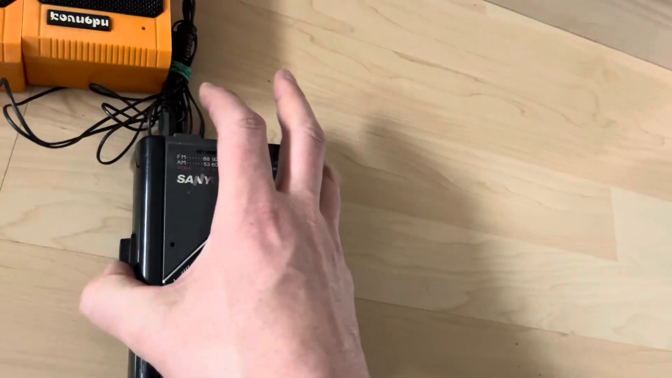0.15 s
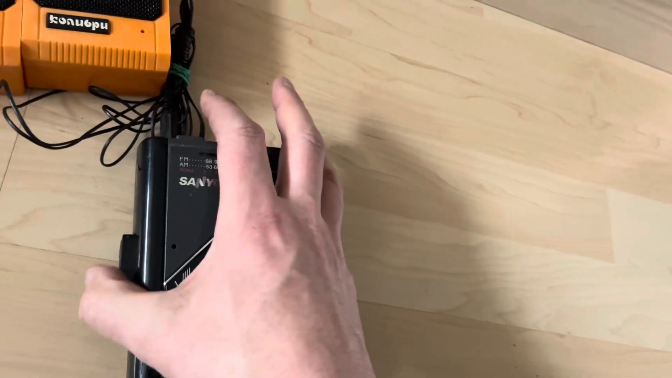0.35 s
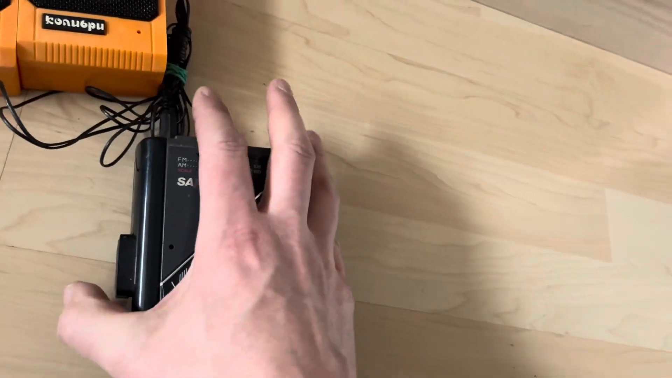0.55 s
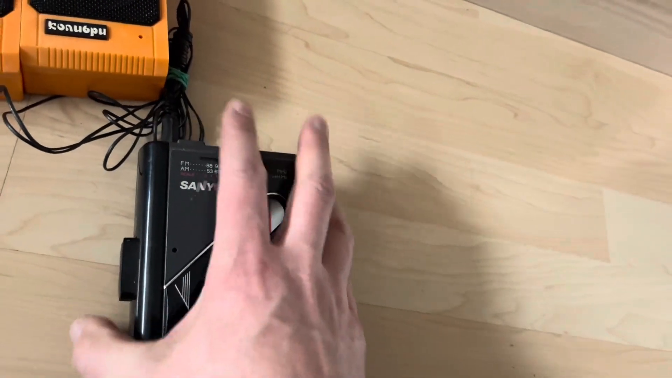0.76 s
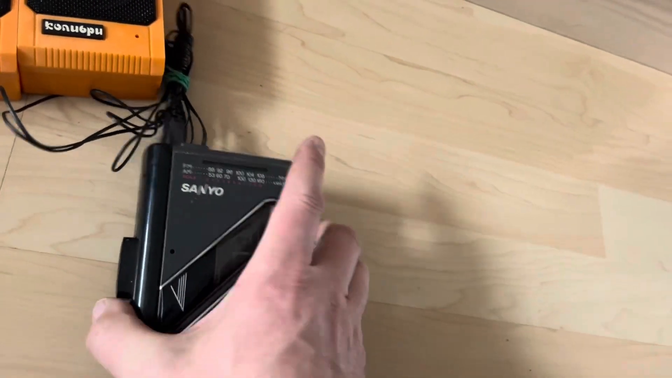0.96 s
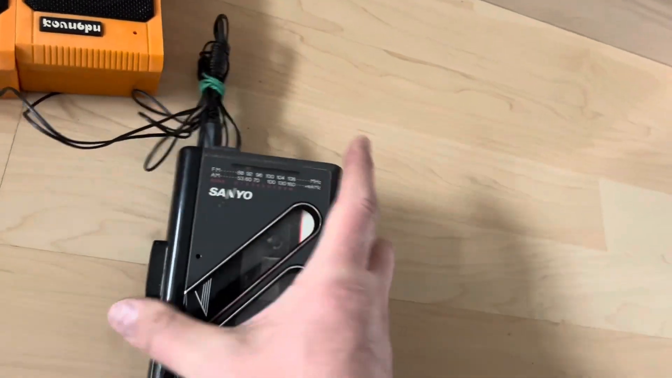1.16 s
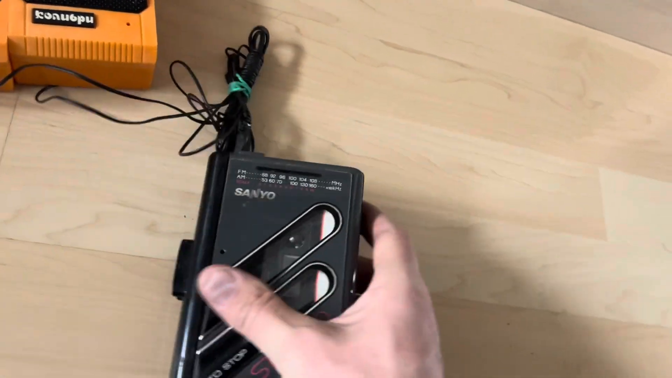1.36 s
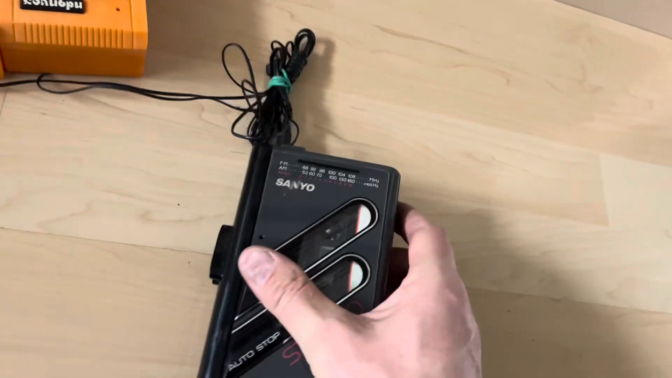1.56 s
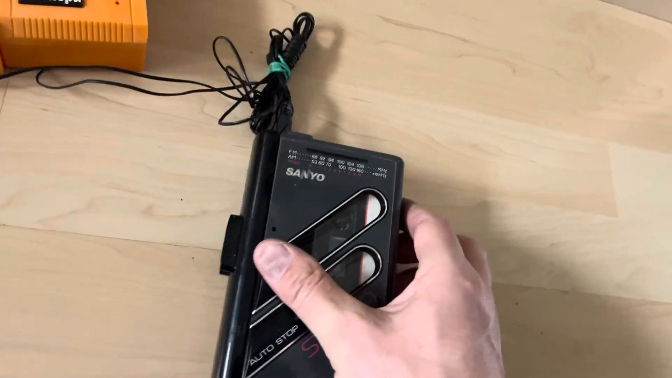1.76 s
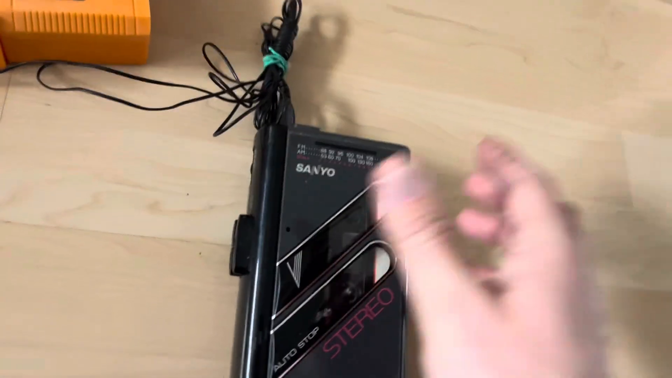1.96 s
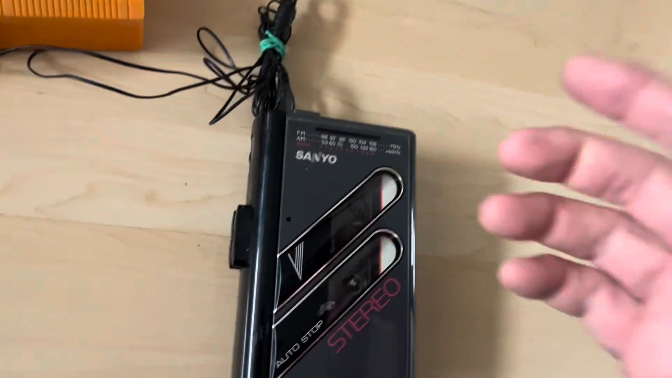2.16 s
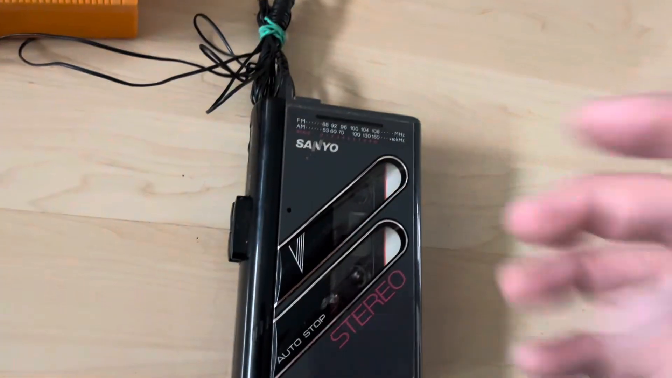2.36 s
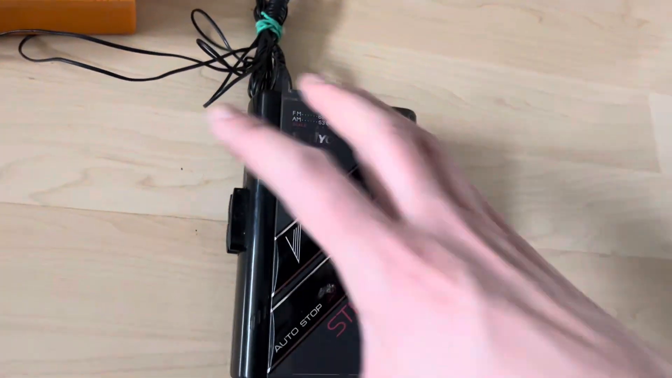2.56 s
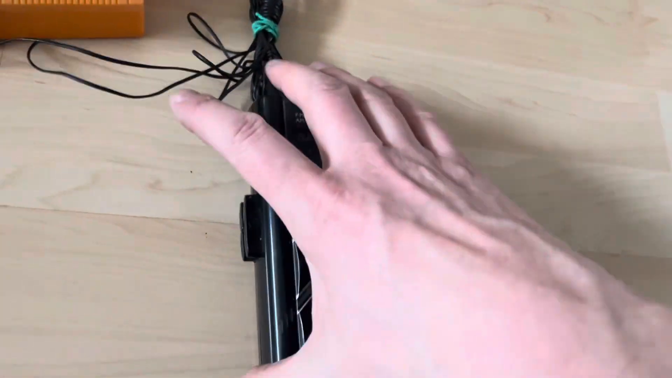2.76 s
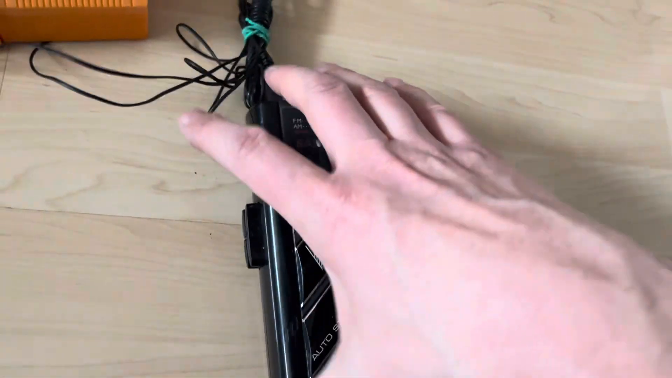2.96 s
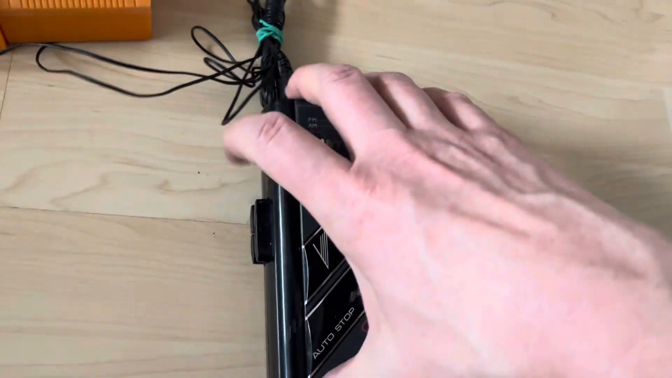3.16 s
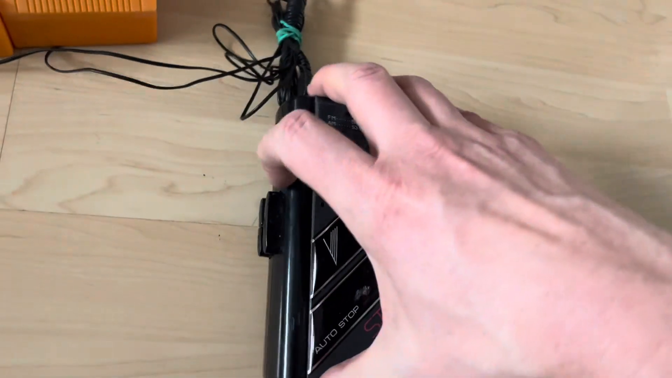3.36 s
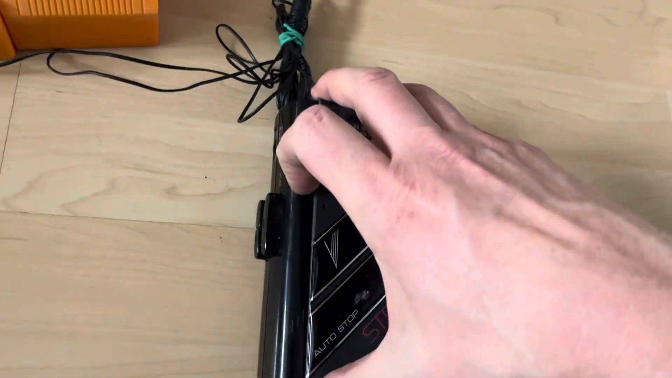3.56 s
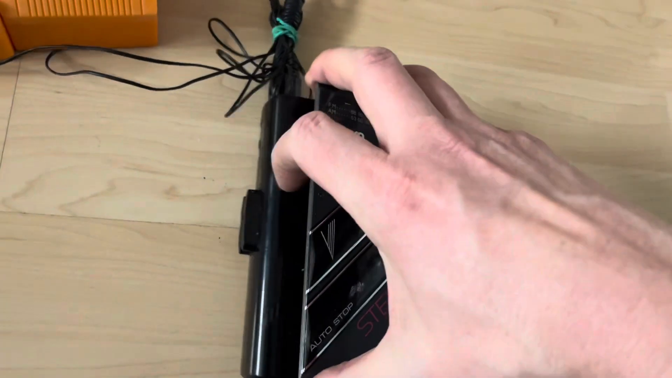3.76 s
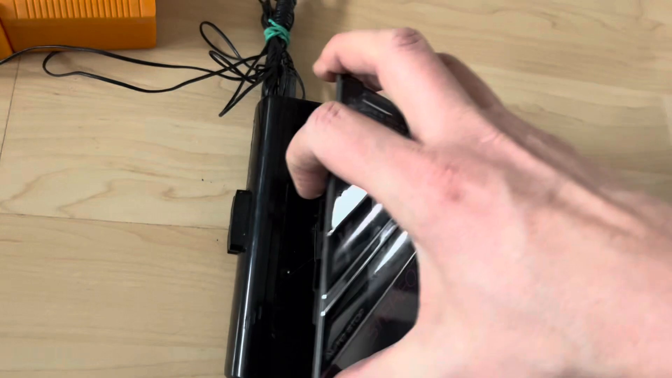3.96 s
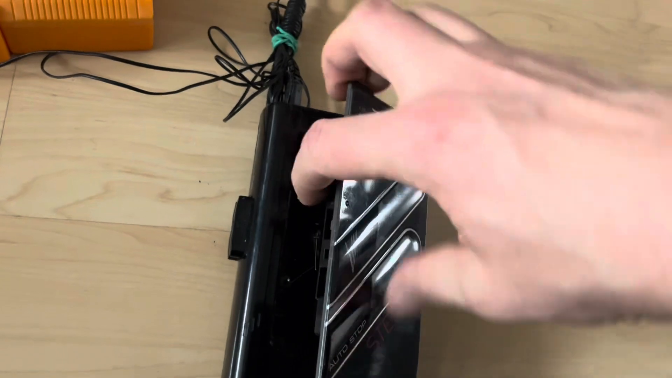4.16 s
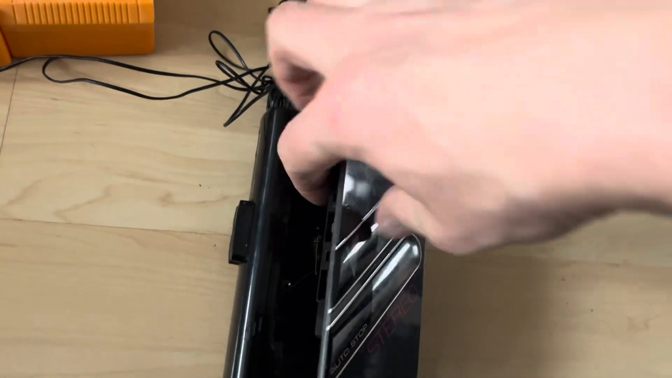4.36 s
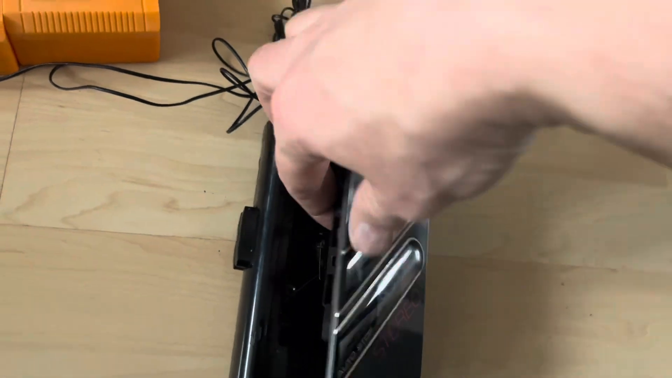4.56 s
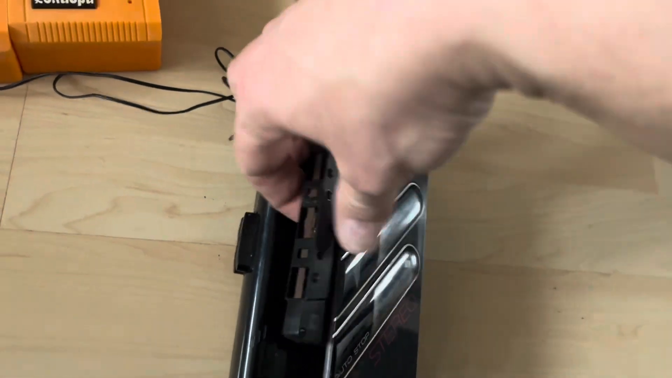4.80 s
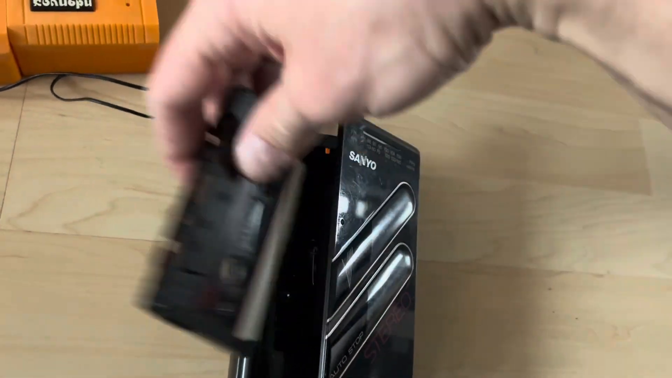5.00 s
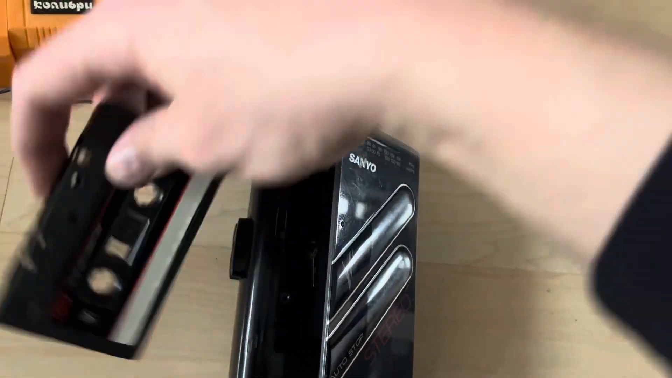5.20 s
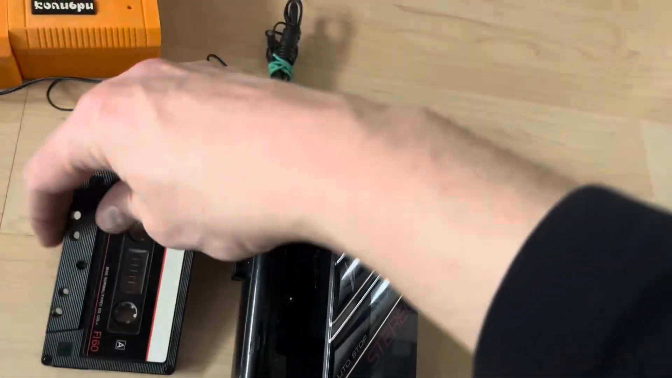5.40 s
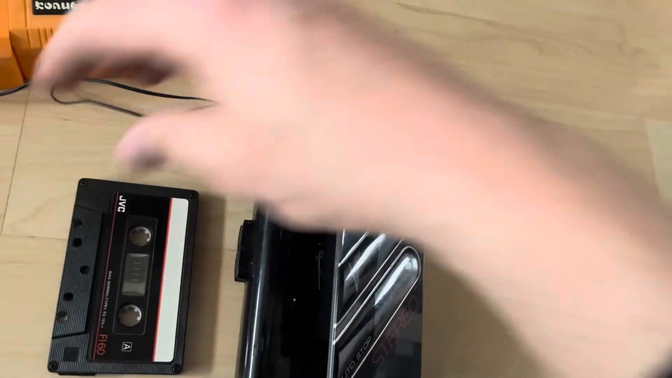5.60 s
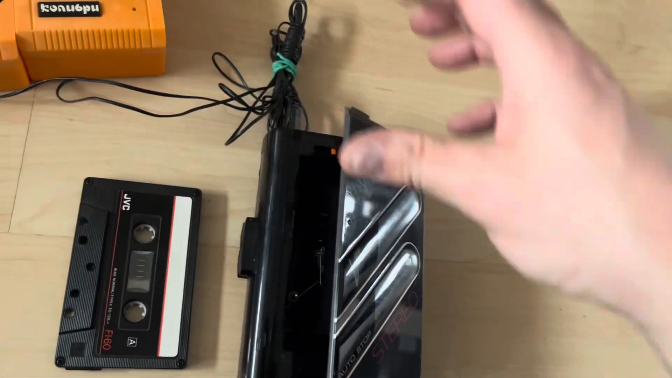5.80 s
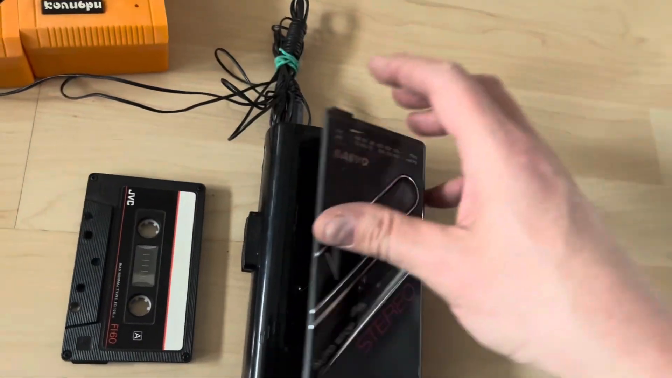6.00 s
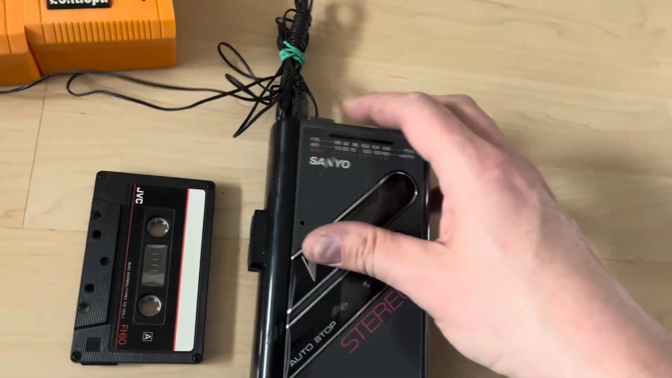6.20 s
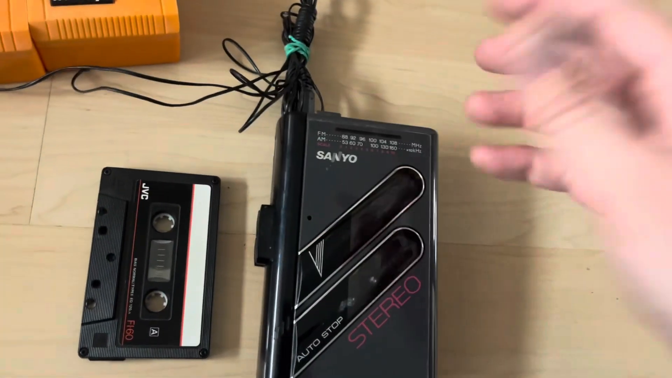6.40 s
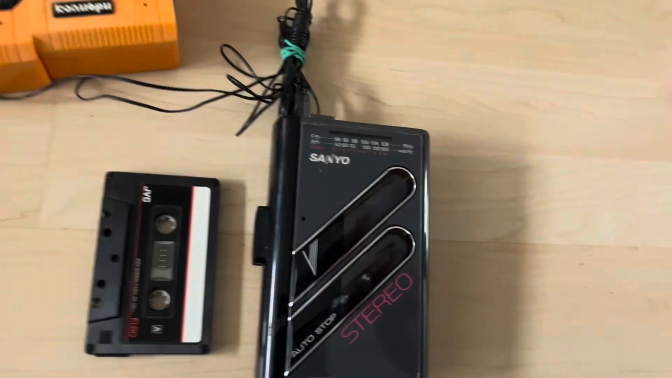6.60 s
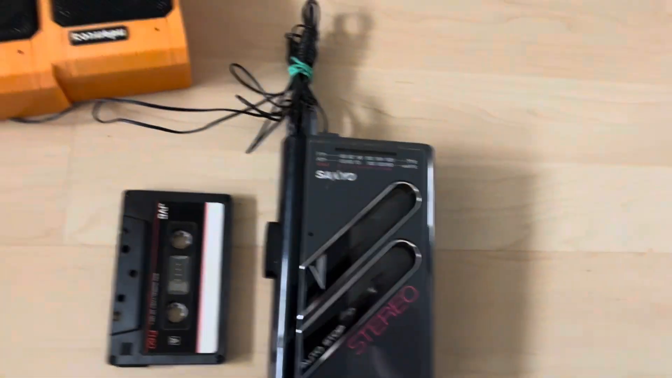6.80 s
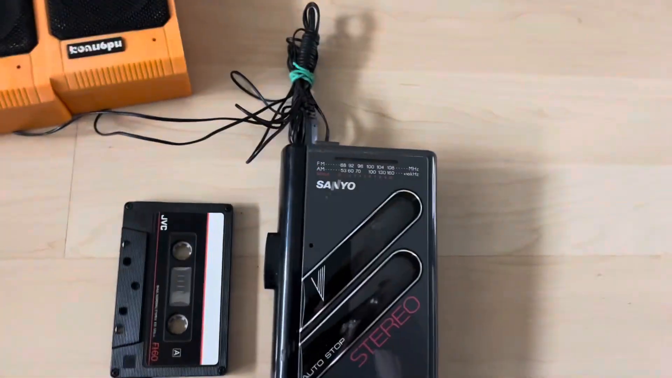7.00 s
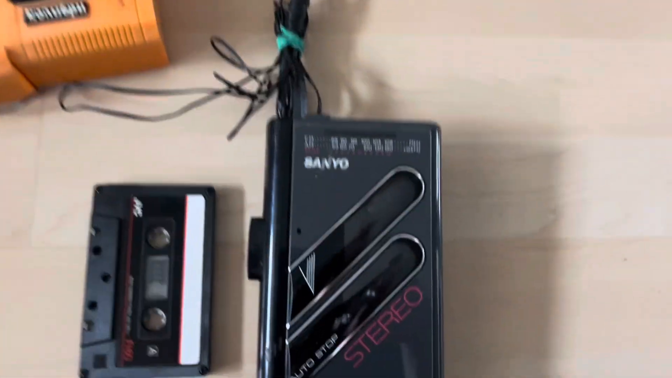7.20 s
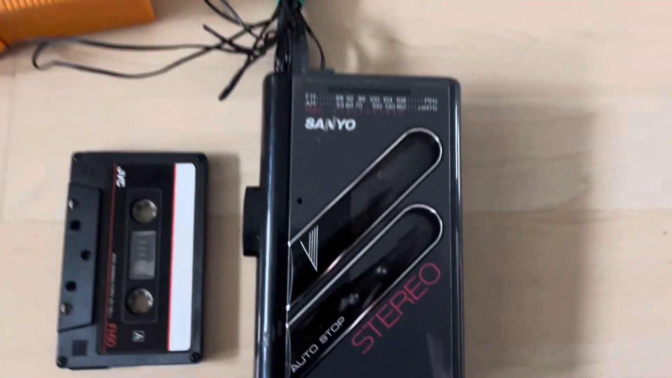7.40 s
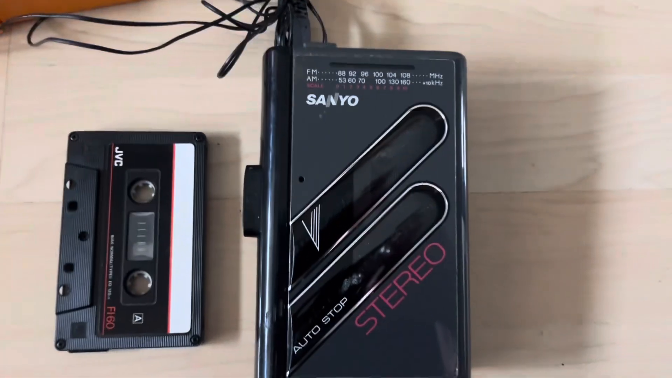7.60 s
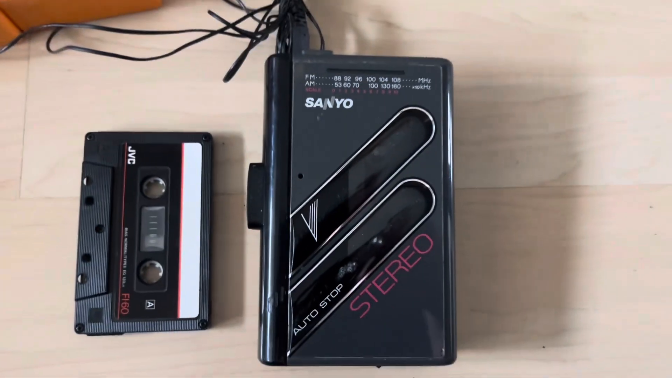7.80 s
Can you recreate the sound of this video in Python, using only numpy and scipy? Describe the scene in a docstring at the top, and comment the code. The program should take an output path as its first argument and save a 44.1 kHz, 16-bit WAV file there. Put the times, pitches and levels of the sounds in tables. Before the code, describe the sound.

Hands handle a plastic cassette player on a floor with clicks and dull knocks, set the cassette down and snap the door shut.

```python
"""Hands turn a portable cassette player on a laminate floor, fingers rubbing the case, a sleeve rustling; let
go, it rocks to rest. They prise its door open, slide the cassette out and set it down, and at six seconds the
door snaps shut. Contacts crack in the plastic shell and thump the floor panel. At the end come faint creaks of
fingers on the glass of a phone and soft scuffs of the grip on it, whose two ports listen close by in a small
room."""
import sys
import numpy as np
from scipy import signal
from scipy.fft import rfft, irfft, next_fast_len
from scipy.io import wavfile

SR = 44100
rng = np.random.default_rng(int(sys.argv[2]) if len(sys.argv) > 2 else 0)


def put_to_file(sound):
    """Save the sound as 16-bit audio at rate SR, in the file named by the first command-line argument."""
    columns = np.atleast_2d(sound).T  # one column per channel
    safe = np.clip(columns, -1, 1)
    whole_steps = np.round(safe * 32767)
    wavfile.write(sys.argv[1], SR, whole_steps.astype(np.int16))


N = 346075
TIME = np.arange(N) / SR
PADDED = next_fast_len(N, True)
BIN_HZ = np.fft.rfftfreq(PADDED, 1 / SR)
SIDES = np.array([[1], [-1]])  # left, right


def undb(db):
    """Decibels to gain."""
    return 10 ** (np.asarray(db) / 20)


def unit(x):
    """Scale to rms 1."""
    return x / np.sqrt(np.mean(x ** 2, axis=-1, keepdims=True) + 1e-20)


def fade(t, t60):
    """Exponential decay, 60 dB down at t60."""
    return np.exp(-np.log(1000) * t / np.maximum(t60, 1e-3))


def at_hz(hz, points, values):
    """Straight lines on a log-frequency axis."""
    return np.interp(np.log(np.maximum(hz, 1)), np.log(points), values)


def colour(x, spectrum, tilt_db=0):
    """Shape a signal with an EQ curve, tilted per octave; rms 1."""
    size = next_fast_len(x.shape[-1], True)
    hz = np.fft.rfftfreq(size, 1 / SR)
    db = at_hz(hz, *np.transpose(spectrum)) + tilt_db * np.log2(hz + 1)
    return unit(irfft(rfft(x, size) * undb(db), size)[..., :x.shape[-1]])


def band(x, hz, octaves):
    """Causal band-pass around hz."""
    edges = [hz / 2 ** (octaves / 2), min(hz * 2 ** (octaves / 2), SR / 2 - 1)]
    return signal.sosfilt(signal.butter(2, edges, "band", fs=SR, output="sos"), x)


def add(track, start, sound):
    """Mix a sound in at its time."""
    i = min(max(int(start * SR), 0), N)
    track[i:i + len(sound)] += sound[:N - i]


def wander(points):
    """A random line through points spread evenly over the scene."""
    return np.interp(TIME, np.linspace(0, TIME[-1], points), rng.standard_normal(points))


def grains(count, per_s, spread_db):
    """Tiny slips of uneven size at random moments."""
    slips = (rng.random(count) < per_s / SR) * rng.standard_normal(count)
    return slips * undb(spread_db * rng.standard_normal(count))


def ring(modes, t, gains=1):
    """Sum of decaying sines."""
    hz, db, t60 = np.transpose(modes)
    return (gains * undb(db)) @ (np.sin(2 * np.pi * hz[:, None] * t) * fade(t, t60[:, None]))


def blows(events, modes):
    """Each blow sets the same object ringing; neighbouring modes swing in opposite directions."""
    out, signs = np.zeros(N), (-1) ** np.arange(len(modes))
    for start, db in events:
        add(out, start, undb(db) * ring(modes, TIME[:SR // 4], signs))
    return out


# The low bed of the room. Each row: frequency in Hz, relative level in dB.
ROOM_TONE_EQ = [(20, -17), (40, -7.5), (58, 6), (100, 2), (200, -5.5), (380, -18), (540, -14.5), (900, -29),
                (1500, -18.5), (2300, -27.5), (4000, -40.5), (8000, -48), (16000, -51.5)]

def room_tone(level_db=-59.5, side_db=-8, drift_db=0.8):
    """A quiet indoor rumble that wanders slowly; left and right share its bass."""
    mid, side = colour(rng.standard_normal((2, N)), ROOM_TONE_EQ)
    side = irfft(rfft(side, PADDED) * np.minimum(BIN_HZ / 300, 1), PADDED)[:N]
    return (mid + undb(side_db) * side * SIDES) * undb(level_db + drift_db * wander(30))


# Small-room reverb. Each row: frequency in Hz, energy against the direct sound in dB, t60 in seconds.
REVERB = [(150, -12.5, 0.4), (393, -11, 0.3), (1000, -13, 0.18), (3060, -10.5, 0.18), (8600, -14.5, .21),
          (15000, -24, .18)]

def room_echo(x, gap_s=0.01, build_s=0.0017):
    """Walls and furniture return a short diffuse tail, narrow in the bass and wide on top."""
    t = TIME[:SR // 2]
    points, level_db, t60 = np.transpose(REVERB)
    onset = 1 - np.exp(-np.maximum(t - gap_s, 0) / build_s)
    response = 0
    for hz in np.geomspace(125, 16000, 8):
        noise = band(rng.standard_normal((2, len(t))), hz, octaves=1)
        mid, side = unit(noise * onset * fade(t, at_hz(hz, points, t60)))
        width = min(hz / 1400, .8)
        energy = np.sqrt(2) * hz / SR / len(t) / (1 + width ** 2)
        response += (mid + width * side * SIDES) * np.sqrt(energy) * undb(at_hz(hz, points, level_db))
    return signal.fftconvolve(x[None], response, axes=1)[:, :N]


# Spells in which fingers creak on the phone's glass. Each row: start in seconds, length in seconds, tick level
# in dB.
CREAK_SPELLS = [(6.416, 0.32, -54), (6.735, 0.15, -58), (7.72, 0.14, -48.5)]

def creak_ticks(count=16, gap_s=0.022, spread_db=2.5):
    """Within a spell the fingers tick at uneven gaps and strengths; gives times and levels."""
    ticks = []
    for start, length, db in CREAK_SPELLS:
        delays = gap_s * (np.arange(count) + rng.random(count))
        levels = db + spread_db * rng.standard_normal(count)
        ticks += [(start + delay, level) for delay, level in zip(delays, levels) if delay < length]
    return ticks


def glass_creaks(high_hz=1100, low_hz=280, sweep_s=0.003, peak_s=0.002594, grit_db=-2):
    """Fingers creak on the phone's glass; each tick arrives as a short, gritty falling chirp."""
    t, out = TIME[:SR // 25], np.zeros(N)
    grit_eq = [(60, -5.5), (300, 18), (800, -7.5), (1500, -17), (4000, -45.5)]
    sweep = low_hz + (high_hz - low_hz) * np.exp(-t / sweep_s)
    envelope = (t / peak_s * np.exp(1 - t / peak_s)) ** 2
    for start, db in creak_ticks():
        hz = sweep * np.exp(0.11 * rng.standard_normal())
        chirp = np.sin(2 * np.pi * np.cumsum(hz) / SR)
        grit = undb(grit_db) * colour(rng.standard_normal(len(t)), grit_eq)
        add(out, start - peak_s, undb(db) * envelope * (chirp + grit))
    return out


# The hollow voice of the plastic case. Each row: mode frequency in Hz, level in dB, t60 in seconds.
CASE_MODES = [(671, -4, 0.19), (707, -5, 0.33), (941, -3.5, 0.011), (1250, -2, .06), (1491, 4, .07),
              (2055, -8, 0.035), (2500, -3, 0.055), (2646, -1.5, 0.081), (3200, -3.5, .06),
              (3600, -4, 0.11), (4640, -3, 0.022), (5300, -8.5, 0.18), (7130, -6, 0.06)]

def hollow(x, ring_db=-5):
    """Friction also feeds the modes of the plastic shell; rms 1."""
    ringing = signal.oaconvolve(x, ring(CASE_MODES, TIME[:SR // 8]))[:len(x)]
    return unit(x + undb(ring_db) * unit(ringing))


def judder(strokes, spectrum, first_pressure=0.13):
    """Surfaces judder along each other, pressing harder until they come free."""
    out = np.zeros(N)
    for start, length, db, tilt_db in strokes:
        count = int(length * SR)
        pressure = np.linspace(first_pressure, 1, count) * signal.windows.tukey(count, .3)
        slips = colour(grains(count, per_s=9500, spread_db=2.0), spectrum, tilt_db)
        add(out, start, undb(db) * pressure * hollow(slips))
    return out


# Soft scuffs. Each row: start and length in seconds, full-pressure level in dB, tilt in dB per octave.
GRIP_SCUFFS = [(7.025, 0.055, -45, -1.5), (7.10, 0.044, -55, -2), (7.17, 0.129, -64, -1),
               (7.41, 0.094, -57.5, -2)]
# Their muffled tone. Each row: frequency in Hz, relative level in dB.
SCUFF_EQ = [(100, -16.5), (400, -13), (680, 6), (1050, -11.5), (1300, -5.5), (2000, -4.5), (2900, -29),
            (6000, -25), (12000, -30)]

def grip_scuffs():
    """The hand slips a little as its grip on the phone shifts."""
    return judder(GRIP_SCUFFS, SCUFF_EQ)


def stroke_envelope(start, length, attack_s=0.15, t60=0.54):
    """The hand speeds up, slides evenly, then comes to rest."""
    attack = np.clip((TIME - start) / attack_s + .5, 0, 1)
    return attack * fade(np.maximum(TIME - start - length, 0), t60)


# Strokes of the hand. Each row: start in seconds, length in seconds, rub level in dB, sleeve level in dB.
HAND_STROKES = [(0.0, 0.03, -45.5, -65), (0.115, 0.27, -64, -84), (0.68, 0.13, -77, -64.5),
                (0.816, 0.15, -58, -64), (1.06, 0.2, -55.5, -60), (1.4, 0.11, -56.5, -62.5),
                (1.825, 0.049, -56.5, -63.5), (1.98, 0.48, -90, -70.5), (2.66, 0.071, -57, -69.5),
                (2.882, 0.23, -56.5, -73), (3.247, 0.18, -58, -72.5), (3.592, 0.047, -48, -55),
                (3.71, 0.17, -59, -66.5), (3.95, 0.23, -64, -67.5), (4.34, 0.2, -66, -67.5),
                (4.596, 0.18, -48.5, -58.5), (4.912, 0.2, -60.5, -58.5), (5.3, 0.33, -64, -63),
                (6.301, 0.36, -70, -68.5)]
# The dull rub of the shell. Each row: frequency in Hz, relative level in dB.
RUB_EQ = [(150, -1.5), (420, -16.5), (680, 1.5), (900, -2.5), (1300, -3), (1700, -9), (2200, -11.5),
          (3400, -19), (5500, -18), (12000, -35.5)]
# The airy rustle of a sleeve as the arm moves. Each row: frequency in Hz, relative level in dB.
SLEEVE_EQ = [(800, -20), (2000, 1), (3800, 3.5), (5200, 4.5), (6200, 6.5), (7200, -2), (10500, -2),
             (13000, -6), (16000, -7.5)]

def fingers_and_sleeve(grip_db=2.0, catches_per_s=20, catch_db=-9, catch_t60=0.0067):
    """Fingers drag over the case with a grainy rub and small catches; a sleeve rustles as the arm moves."""
    rub_level, sleeve_level = 0, 0
    for start, length, rub_db, sleeve_db in HAND_STROKES:
        envelope = stroke_envelope(start, length)
        rub_level = np.maximum(rub_level, undb(rub_db) * envelope)
        sleeve_level = np.maximum(sleeve_level, undb(sleeve_db) * envelope)
    grip = undb(grip_db * wander(240))  # the fingers' hold changes some thirty times a second
    drag = hollow(colour(grains(N, per_s=2500, spread_db=3.0), RUB_EQ), ring_db=-6.5) * grip
    # now and then a nail or a loose part catches with a tiny tick
    snags = np.abs(grains(N, per_s=catches_per_s, spread_db=3.0))
    ticks = signal.oaconvolve(snags, fade(TIME[:SR // 20], catch_t60))[:N] * rng.standard_normal(N)
    catches = hollow(colour(ticks, RUB_EQ, tilt_db=1.0), ring_db=-11.5)
    sleeve = colour(rng.standard_normal(N), SLEEVE_EQ)
    return (drag + undb(catch_db) * catches) * rub_level + sleeve * sleeve_level


# Short scrapes. Each row: start and length in seconds, full-pressure level in dB, tilt in dB per octave.
PLASTIC_SCRAPES = [(0.282, 0.037, -37, -1), (0.899, 0.055, -53.5, -1.5), (1.851, 0.016, -33, -1),
                   (4.631, 0.014, -22, -1.5), (4.642, 0.035, -37, 6), (4.711, 0.12, -34.5, 0),
                   (4.788, 0.015, -20, 0), (4.861, 0.036, -44, 4.5), (5.482, 0.033, -25.5, 4),
                   (5.552, 0.048, -38.5, -1.5)]
# Their mid-heavy rasp. Each row: frequency in Hz, relative level in dB.
SCRAPE_EQ = [(200, -31), (450, -13), (700, 3), (880, -3), (1030, 7), (1250, -3), (2100, -8), (2350, -8),
             (2580, 0.5), (3400, -8.5), (5500, -11.5), (10000, -18), (13000, -27), (16000, -29.5)]

def plastic_scrapes():
    """Plastic sticks and slips as it slides on plastic."""
    return judder(PLASTIC_SCRAPES, SCRAPE_EQ)


def rocking(start_s=2.007, period_s=0.09, first_db=-42, loss_db=2.5, count=4):
    """Let go, the player rocks to rest in even, weakening bumps; gives times and levels."""
    return [(start_s + k * period_s, first_db - k * loss_db) for k in range(count)]


# Bumps on the floor, the weight under the clicks. Each row: start in seconds, level in dB.
FLOOR_BUMPS = [(0.0, -27), (0.047, -31), (0.075, -44), (0.324, -34.5), (0.36, -32), (0.412, -33.5),
               (0.832, -34.5), (0.879, -39), (0.964, -33), (1.117, -37), (1.448, -23), (1.599, -29.5),
               (1.863, -13), (1.908, -20.5), (2.689, -31.5), (2.907, -15), (2.959, -27), (3.11, -30.5),
               (3.645, -33), (3.807, -21.5), (3.842, -29), (3.993, -40), (4.38, -25.5), (4.43, -34.5),
               (4.457, -28.5), (4.585, -30), (4.641, -18), (4.814, -22.5), (4.858, -33), (4.974, -41.5),
               (5.288, -22), (5.4, -33.5), (5.506, -9.5), (5.548, -19.5), (6.056, -21.5), (6.087, -25.5),
               (6.22, -27), (6.257, -22.5), (6.345, -35)]

def floor_thuds(panel_hz=152, scatter=0.053, rise_s=0.012, swell=2.2, glide=0.96, glide_s=0.0025,
                boom_db=-20, boom_t60=0.29, sway_hz=82, sway_db=-25, sway_t60=0.38):
    """The floor panel swings up over a few cycles and dies away; the floor beneath sways slowly on."""
    t, out = TIME[:SR // 4], np.zeros(N)
    boom_eq = [(25, -19.5), (60, -5.5), (130, 0.5), (200, 4), (300, -9.5), (600, -45.5), (2000, -71.0)]
    envelope = (t / rise_s * np.exp(1 - t / rise_s)) ** swell
    onset = 1 - np.exp(-t / 0.00035)
    sway = ring([(sway_hz, sway_db, sway_t60)], t)
    pitch_drop = 1 + glide * np.exp(-t / glide_s)  # the faster, higher bending waves arrive first
    for start, db in FLOOR_BUMPS + rocking():
        # the pitch varies a little with the place of the bump
        hz = panel_hz * np.exp(scatter * rng.standard_normal()) * pitch_drop
        panel = envelope * np.sin(2 * np.pi * np.cumsum(hz) / SR)
        boom = undb(boom_db) * colour(rng.standard_normal(len(t)), boom_eq) * fade(t, boom_t60)
        add(out, start, undb(db) * (panel + (boom + sway) * onset))
    return out


# The cassette touches down. Each row: start in seconds, level in dB.
CASSETTE_HITS = [(5.294, -25.5), (5.505, -17), (5.550, -30)]
# The knock of the floor panel. Each row: mode frequency in Hz, level in dB, t60 in seconds.
PANEL_MODES = [(115, -7, 0.13), (215, 0, .06), (255, -1, .055), (295, 0, 0.055), (335, -4, 0.045),
               (420, -5, 0.033)]

def cassette_landing():
    """The hard edge of the cassette lands on the floor and rings the panel."""
    return blows(CASSETTE_HITS, PANEL_MODES)


SHELL_LOW_HZ, SHELL_HIGH_HZ = 734, 9600  # the shell radiates well between these edges

def click_db(hz, db, tilt_db, narrow_db, centre_hz=2530):
    """A hard contact is brighter than a soft one; a small part rings in a narrower range than the shell."""
    octaves = np.log2(np.clip(hz, SHELL_LOW_HZ, SHELL_HIGH_HZ) / centre_hz)
    return db + tilt_db * octaves - narrow_db * octaves ** 2


# Plastic contacts. Each row: start in seconds, level at the centre frequency in dB,
# tilt in dB per octave, narrowness in dB per octave squared.
CONTACTS = [(0.043, -49, -5, -0.5), (0.078, -47.5, -3.4, -0.5), (0.304, -52, 10.5, 6.5),
            (0.322, -34, -3, 0.46), (0.412, -57.5, -16, 7.5), (0.831, -65.5, -10.5, 0.5),
            (0.867, -59, -5.5, 0), (0.912, -60.5, -7, -1.5), (0.963, -50.5, -8, -0.25),
            (1.107, -62, -13.5, 4.5), (1.186, -57, -4, -.7), (1.223, -52, -5.5, 0), (1.448, -53, -6, -2.2),
            (1.589, -38.5, -4.5, 0), (1.8625, -43, -10, 2), (1.9044, -37, -4.5, 2.5),
            (2.621, -68.5, -10, -0.5), (2.684, -61.5, -7, -0.5), (2.85, -68.5, -8.5, 0),
            (2.8995, -31, -5, 3), (2.921, -47.5, -4.5, 1), (2.958, -49, -14.5, 8.5), (3.114, -62, -9, 2.5),
            (3.237, -71, -13.5, 0), (3.432, -75.5, -17.5, 2), (3.752, -60.5, -5.5, 0.5),
            (3.806, -41, -1, 2.5), (3.917, -51.5, -4.5, 8), (4.191, -60.5, -11, 2.5), (4.38, -46, -3, 3),
            (4.432, -52, -1, 2), (4.456, -53, -9.5, 6.5), (4.481, -51.5, -0.5, 0),
            (4.586, -41.5, -3.5, 2.5), (4.6435, -31, -1, 2.4), (4.7895, -33, -3, 0), (4.8024, -30, 1, -0.5),
            (4.819, -50, 3.5, 1), (4.861, -39, -1, 0.5), (4.965, -48.5, 5, 2), (4.988, -61.5, 13, 2),
            (5.114, -46.5, -3, 2), (5.293, -28.5, -1, 1), (5.4027, -34.5, 1.6, 2.4), (5.4785, -37, 1.5, .5),
            (5.5035, -19.5, 4, 3), (5.5494, -27.5, 0, 0), (5.5733, -38.5, 0.5, -0.5),
            (5.891, -64, -3.5, -1.5), (6.0532, -24, -2.5, -2.23), (6.21, -58, -4, 0.8),
            (6.226, -53.5, -7, 2), (6.254, -50, -13, 6)]

def plastic_clicks(contact_s=0.00012, crack=0.54, crack_t60=0.0012, ring_t60=0.04, damping=0.29,
                   firm_db=-22, modes_db=-12, scatter_db=6.5, low_slope_db=11.0, top_slope_db=-8):
    """Each contact cracks, rings the shell's dense short modes and leaves the main case modes sounding."""
    table, t, out = np.array(CONTACTS), TIME[:SR // 7], np.zeros(N)
    # a contact as hard as firm_db holds the parts tight and halves their ring
    freedom = 1 / (1 + undb(table[:, 1:2] - firm_db))
    onset = 1 - np.exp(-t / contact_s)
    band_gain = np.sqrt(.5 * .01 / t[-1])  # half an octave's share of the energy of a 10 ms hit
    hits = 0
    for hz in np.geomspace(240, 15360, 13):
        # a small shell radiates little bass, and the contact time rounds off the very top
        bass_db = low_slope_db * min(np.log2(hz / SHELL_LOW_HZ), 0)
        top_db = top_slope_db * max(np.log2(hz / SHELL_HIGH_HZ), 0)
        db = click_db(hz, *table[:, 1:].T) + bass_db + top_db
        envelope = fade(t, freedom * ring_t60 * (3000 / hz) ** damping) + crack * fade(t, crack_t60)
        burst = band(rng.standard_normal((len(table), len(t))) * envelope * onset, hz, octaves=0.61)
        hits += unit(burst) * undb(db)[:, None] * band_gain
    mode_hz = np.array(CASE_MODES)[:, 0]
    for (start, *contact), hit, free in zip(table, hits, freedom):
        # the place of the contact decides how strongly, and which way, each mode is pushed
        push = rng.choice([-1, 1], len(mode_hz)) * undb(scatter_db * rng.standard_normal(len(mode_hz)))
        gains = push * undb(click_db(mode_hz, *contact) + modes_db)
        add(out, start, hit + free * ring(CASE_MODES, t, gains))
    return out


# The closing snap and its rebound. Each row: start in seconds, level in dB.
LATCH_HITS = [(6.0535, -17.5), (6.0675, -22.5)]
# The clack of the door. Each row: mode frequency in Hz, level in dB, t60 in seconds.
DOOR_MODES = [(350, -8, 0.028), (436, -7, .05), (518, -8, 0.08), (598, -9, .08), (664, -3, 0.115),
              (727, -5, .095), (974, -5, .028), (1373, -13, 0.03), (1950, -13, .03), (5590, -10, .012),
              (9700, -8, 0.012)]

def door_snap():
    """The door slams on its latch and rebounds, ringing each time."""
    return blows(LATCH_HITS, DOOR_MODES)


def scene():
    """All handling sounds, their echo and the quiet room."""
    knocks = plastic_clicks() + floor_thuds() + door_snap() + cassette_landing()
    friction = plastic_scrapes() + grip_scuffs() + glass_creaks() + fingers_and_sleeve()
    near = knocks + friction
    return near + room_echo(near) + room_tone()


# Stereo phase at the phone's ports. Each row: frequency in Hz, lead of left over right in radians.
LEFT_LEAD = [(0, 0), (200, .08), (800, .65), (1400, -.3), (2000, -.1), (2700, -1.8), (3400, -1),
             (4400, -1.4), (5300, -3.2), (6000, -4.1), (8000, -5), (11500, -6.25), (16000, -6.28)]
# Stereo balance. Each row: frequency in Hz, left minus right in dB.
LEFT_LEAN = [(100, 0.1), (300, 0.5), (700, -0.9), (1150, 3.5), (1600, -2.5), (2600, 3.5), (3700, -3),
             (4800, 3), (6000, 1), (12000, -0.2)]

def record(dry, ceiling=0.85, top_hz=16000):
    """The phone's two ports differ in phase and level; peaks are rounded and the top is cut."""
    lead = np.interp(BIN_HZ, *np.transpose(LEFT_LEAD)) / 2
    lean_db = at_hz(BIN_HZ, *np.transpose(LEFT_LEAN)) / 2
    ports = undb(SIDES * lean_db) * np.exp(1j * SIDES * lead)
    stereo = irfft(rfft(dry, PADDED) * ports, PADDED)[:, :N]
    rounded = stereo / (1 + (stereo / ceiling) ** 6) ** (1 / 6)
    return signal.sosfilt(signal.ellip(10, .2, 90, top_hz, fs=SR, output="sos"), rounded)


dry = scene()
out = record(dry)
put_to_file(out)
```